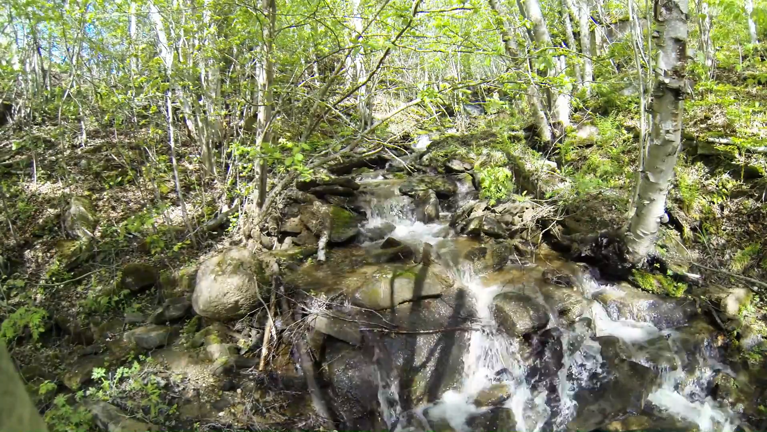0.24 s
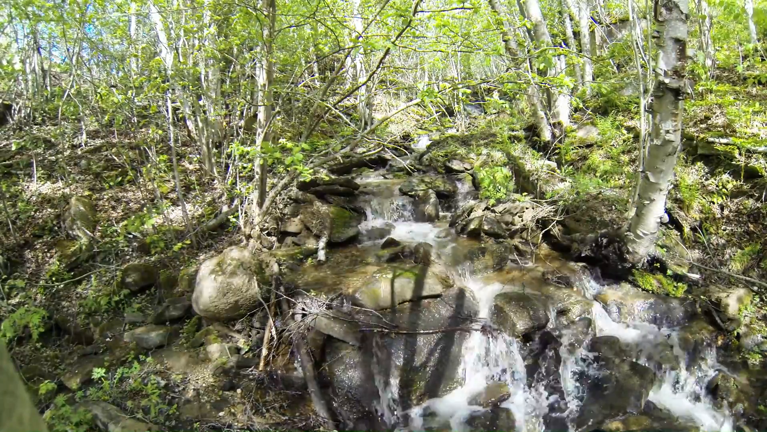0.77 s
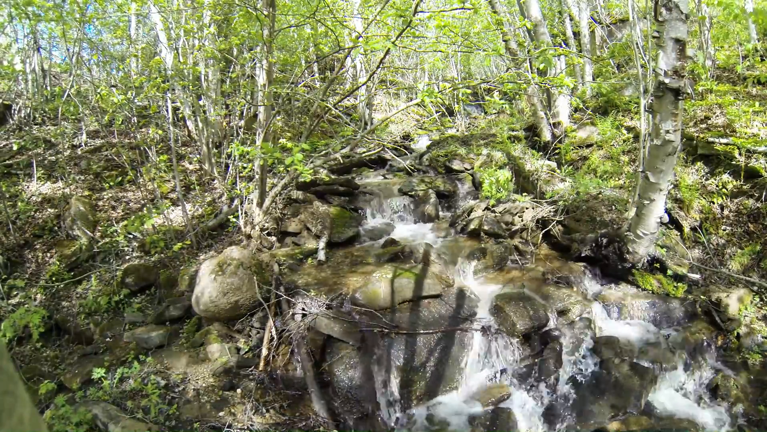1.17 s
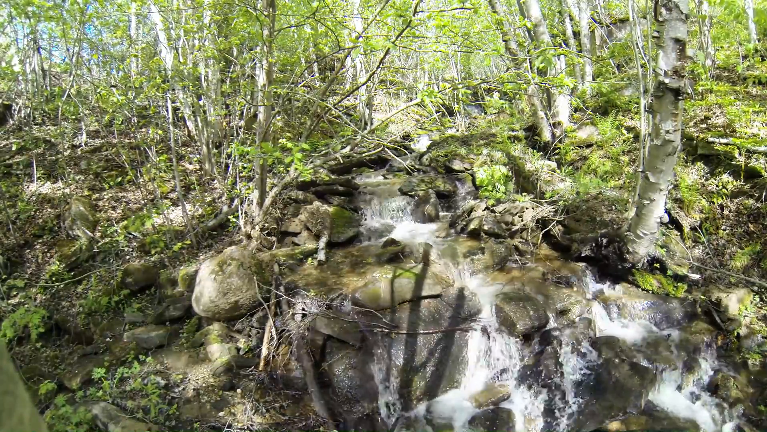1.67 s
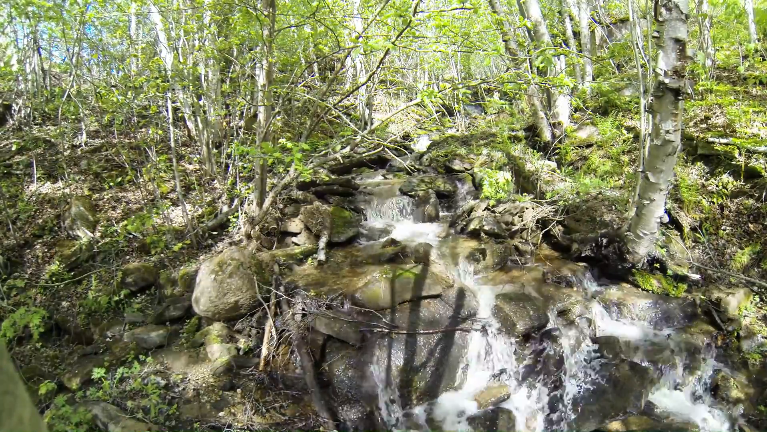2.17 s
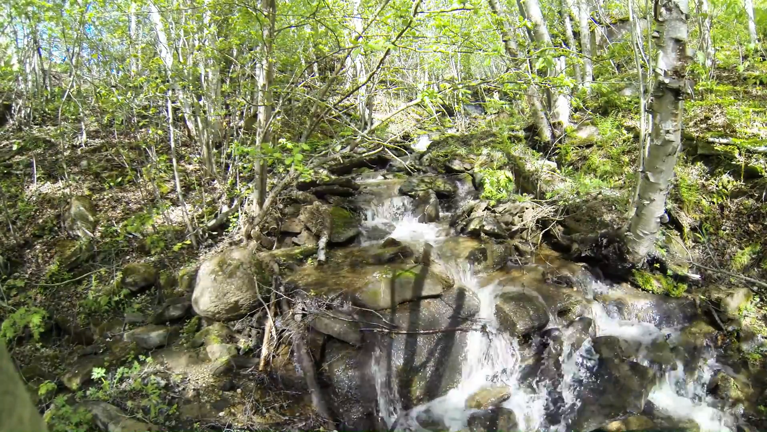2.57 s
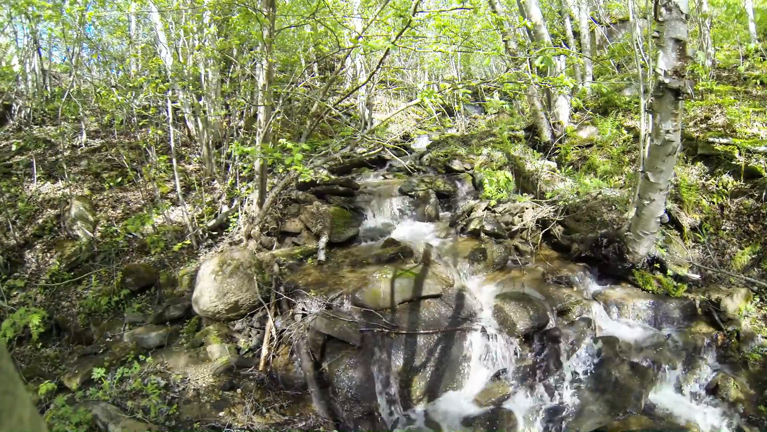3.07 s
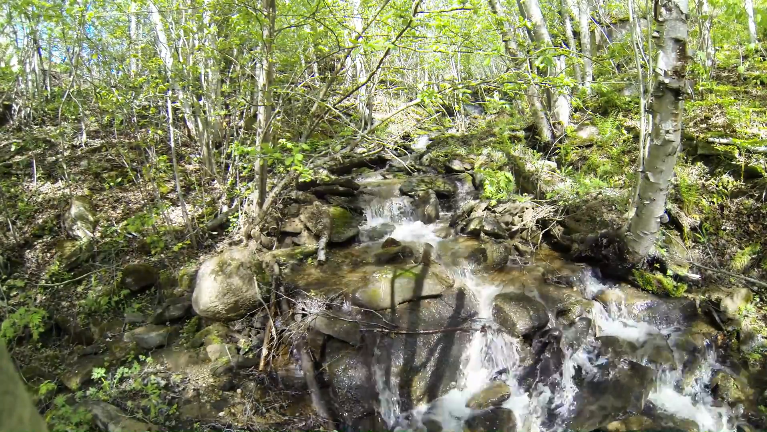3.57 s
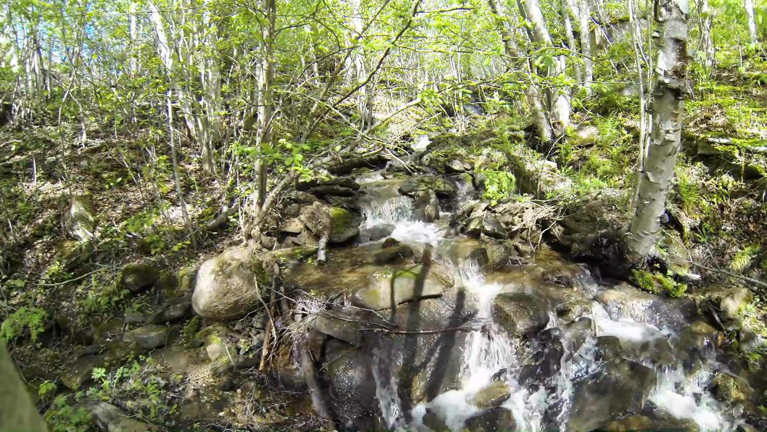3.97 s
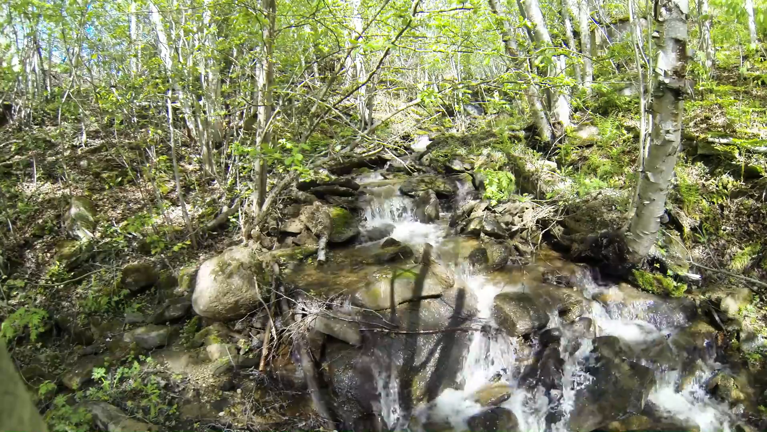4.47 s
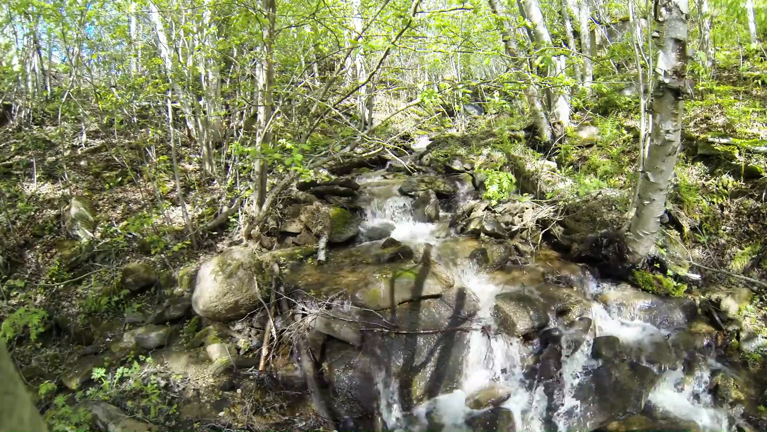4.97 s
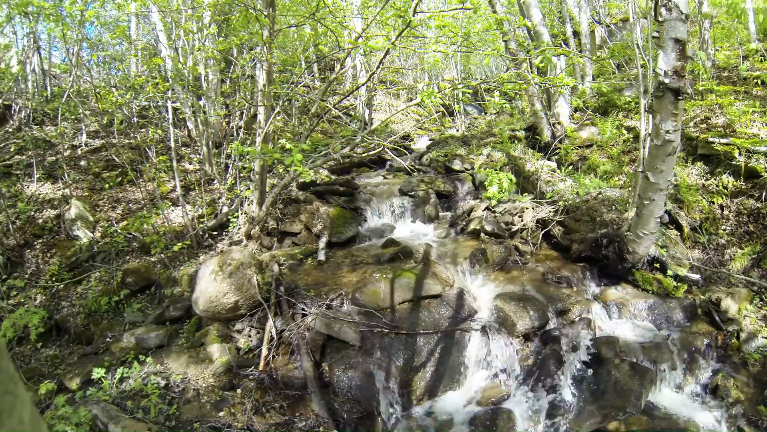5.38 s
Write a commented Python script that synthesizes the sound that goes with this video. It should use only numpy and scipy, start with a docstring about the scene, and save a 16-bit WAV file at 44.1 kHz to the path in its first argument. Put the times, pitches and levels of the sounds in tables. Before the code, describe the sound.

A small stream cascades over rocks, heard in mono from the bank outdoors. Low-mid churning from the plunge pools dominates, over a lumpy deep thrum, with bright hiss and fine patter on stones above. Two soft low wind buffets touch the microphone in the first second or so, then the air calms. Brief hollow gulps and small splashes poke out irregularly while the rush stays constant.

```python
"""Woodland stream over low rock falls

A small woodland stream runs down a series of little rock falls, heard in mono from the bank.
Plunge pools churn and thrum as shaped noise, and clouds of bubbles ring as decaying tones of rising pitch.
Spray and drops spatter on the stones in quick clumps; now and then a gulp rings or a splash fizzes.
Low noise is the breeze on the microphone: it swells in two early gusts and dies down to a calm."""
import sys
import numpy as np
from scipy import signal
from scipy.fft import rfft, irfft
from scipy.io import wavfile
from scipy.ndimage import uniform_filter1d

SR = 44100
rng = np.random.default_rng(int(sys.argv[2]) if len(sys.argv) > 2 else 0)


def digitize_waveform(pressure):
    """Quantize a signal to 16-bit integers and store it at the path in sys.argv[1].

    Rows of a 2-D input are taken as channels; values are limited to [-1, 1].
    """
    field = np.atleast_2d(pressure).T
    bounded = np.clip(field, -1, 1)
    quanta = np.round(bounded * 32767).astype(np.int16)
    wavfile.write(sys.argv[1], SR, quanta)


N = 248724  # length [samples]

# Spectra, all with columns (frequency [Hz], relative level per Hz [dB])
# water churning in the pools
POOL_SPECTRUM = [(100, -37), (190, -6), (240, -0.9), (300, -3.5), (360, 0.2), (400, -1), (520, -0.5),
                 (700, -2), (900, -3.5), (1150, -10.5), (1350, -17), (2400, -36.5)]
# deep thrum under the falls: (frequency [Hz], relative level per Hz [dB])
THRUM_SPECTRUM = [(20, -30), (52, -9.5), (72, -7.5), (92, 2), (120, -4), (146, 0), (175, -5), (210, -17.5),
                  (300, -26), (600, -67)]
# water breaking on the stones: (frequency [Hz], relative level per Hz [dB])
STONE_SPECTRUM = [(900, -27), (1300, -12.5), (1520, -6), (1790, -9.5), (2000, -5), (2450, 0.5),
                  (2900, -2.5), (3350, -5), (3850, -10.5), (4220, -11), (4650, -11), (5100, -12),
                  (5480, -14.5), (5950, -13.5), (7200, -15.5), (8800, -16), (11400, -26.5), (13000, -42)]
# breeze buffeting the microphone: (frequency [Hz], relative level per Hz [dB])
BREEZE_SPECTRUM = [(5, -25), (12, 3), (27, -5), (48, -5), (90, -20), (200, -26), (600, -82)]

# flow into the pools swells or slackens: (time [s], level change [dB], length [s])
POOL_SWELLS = [(.1, 1.2, 0.055), (.24, -1.5, 0.092), (.37, 1, 0.064), (.6, 1.1, 0.14), (.95, -1.5, 0.064),
               (1.11, 1, 0.042), (1.27, -0.5, .07), (1.39, 0.5, .13), (1.67, 0.5, 0.055), (1.88, 0.2, 0.17),
               (2.08, -1, 0.063), (2.29, 1, 0.18), (2.47, -1.2, .05), (2.63, 0, .1), (3.61, -1.3, 0.092),
               (4.23, -1.4, 0.054), (4.32, 1.5, .1), (4.46, 0.5, .06), (4.91, -.9, .12), (5.13, 1.7, 0.051),
               (5.57, .7, 0.083)]
# deep thrum surges or eases: (time [s], level change [dB], length [s])
THRUM_SURGES = [(.04, -4, .12), (.25, 3, .2), (.98, 2.5, .18), (1.36, -2, 0.074), (1.67, -4, 0.072),
                (1.82, 2, .09), (2.2, 1.5, .07), (2.43, -2, 0.084), (2.59, -2.5, 0.073), (2.96, 1.8, .14),
                (3.66, 1, .1), (3.79, 2.5, .09), (4.11, 2.5, .1), (4.32, 1, .08), (4.92, -3, .08),
                (5.05, 1, .13)]
# shower of drops on the stones thickens or thins: (time [s], level change [dB], length [s])
DROP_SHOWERS = [(.58, 2, .22), (2.03, 3, 0.12), (2.77, 2, .08), (2.92, -1, .08), (4.43, -3, 0.07),
                (4.77, 3.5, .14), (5.03, 2, .08), (5.2, -2, .12)]
# gusts on the microphone: (time [s], level swell [dB], length [s])
BREEZE_GUSTS = [(.41, 10, 0.39), (1.15, 7.5, 0.2)]

# large air pockets gulped under a fall:
# (time [s], starting pitch [Hz], relative peak level [dB], ring time to -60 dB [s])
AIR_GULPS = [(.518, 350, -14, 0.15), (.993, 183, -22.5, .08), (1.078, 394, -17, 0.14),
             (1.399, 346, -17, 0.14), (1.765, 837, -20, 0.096), (1.938, 420, -17, .1),
             (2.157, 222, -19, 0.12), (2.264, 622, -17, 0.1), (2.31, 654, -14.5, 0.12),
             (2.324, 475, -17, 0.056), (2.515, 540, -19, .09), (2.658, 442, -18, 0.088),
             (2.738, 498, -22, 0.092), (2.999, 99, -19, .12), (3.058, 617, -17, 0.11),
             (3.271, 117, -8.5, 0.044), (3.486, 660, -16, .055), (3.953, 966, -20.5, 0.15),
             (4.04, 299, -23.5, 0.093), (4.329, 618, -19, 0.076), (4.629, 170, -15.5, 0.069),
             (4.681, 284, -21, .09), (5.264, 252, -20, .1), (5.285, 860, -21, .08)]
# single splashes on the rock: (time [s], centre frequency [Hz], relative level [dB], length [s])
ROCK_SPLASHES = [(0.189, 2840, -26, .016), (.2, 6000, -34, .016), (.369, 1750, -29, .014),
                 (.37, 3130, -23, .013), (.525, 6000, -39, 0.046), (0.777, 2700, -24, .011),
                 (0.773, 5500, -33, .014), (1.25, 5500, -37, .05), (1.445, 3600, -30, .014),
                 (1.868, 2820, -24, 0.023), (2, 2820, -25, 0.013), (2.2, 1680, -29, 0.014),
                 (2.219, 5800, -30, .012), (2.295, 2880, -22, 0.015), (2.374, 1900, -28, .011),
                 (2.786, 2730, -24, .014), (2.883, 8000, -23, 0.0033), (3.108, 2500, -23, 0.016),
                 (3.126, 5500, -30, 0.01), (3.817, 5600, -28, .008), (4.182, 2800, -23, 0.012),
                 (4.807, 2400, -21, 0.011), (4.981, 8900, -29, .0049), (5.399, 2500, -24.5, 0.019),
                 (5.507, 9300, -27, .0046), (5.51, 2620, -24.5, 0.016)]

# the flow wavers by chance about its mean: rms depth in each layer [dB], and rate [per s]
CHURN_WAVER_DB, THRUM_WAVER_DB, STONES_WAVER_DB, WAVERS_PER_S = 0.28, 0.8, 0.28, 13
# single drops on the rock: level against the hiss [dB], drops per second, burst decay [s],
# spread of sizes [dB]
PATTER_DB, PATTERS_PER_S, PATTER_S, PATTER_SPREAD_DB = -7.5, 130, 0.0016, 2.5
# the breeze, gusts aside: first and last level [dB], hold and fade times [s]
BREEZE_DB, CALM_DB, BREEZE_HOLD_S, BREEZE_FADE_S = -38, -49, 0.92, 1.4
EDGE_HZ = 12650  # upper band edge of the recorder


def gain_of(db):
    """Decibels to amplitude."""
    return 10 ** (np.asarray(db) / 20)


def evened(x):
    """Scales to rms 1."""
    return x / np.sqrt(np.mean(x ** 2) + 1e-20)


def steadied(x, size=6000):
    """Holds a sound near rms 1 over spans of size samples, keeping its quicker grain."""
    power = uniform_filter1d(uniform_filter1d(x ** 2, size), size // 2)
    return x / np.sqrt(power + 1e-20)


def coloured(x, spectrum):
    """Filters x by a curve of (frequency [Hz], level [dB]) points, at rms 1."""
    hz, db = np.transpose(spectrum)
    bins_hz = np.fft.rfftfreq(N, 1 / SR)
    curve_db = np.interp(np.log(bins_hz + 1), np.log(hz + 1), db)
    return evened(irfft(rfft(x) * gain_of(curve_db), N))


def wander(rate):
    """Slow chance of rms 1, changing up to about rate times a second."""
    hz = np.fft.rfftfreq(N, 1 / SR)
    lowpass = (hz > 2) / (1 + (hz / rate) ** 2)
    return evened(irfft(rfft(rng.standard_normal(N)) * lowpass, N))


def swells(rows):
    """Smooth rises and falls in dB, one per row, each above half its height for its length."""
    t = np.arange(N) / SR
    return sum(db * 0.5 ** ((2 * (t - s) / length) ** 2) for s, db, length in rows)


def impacts(per_s, spread_db):
    """A random train of impulses of either sign: many small, a few large."""
    size = gain_of(spread_db * np.minimum(rng.exponential(1, N), 5))
    return size * rng.choice([-1, 1], N) * (rng.random(N) < per_s / SR)


def add(mix, s, sound):
    """Mixes a sound in at time s [s]."""
    part = mix[max(round(s * SR), 0):][:len(sound)]
    part += sound[:len(part)]


def bubble(hz, t60, rise, onset_cycles):
    """A pocket of air rings and dies, its pitch rising as it nears the surface."""
    t = np.arange(int(t60 * SR) + 2) / SR
    turns = hz * (t + rise * t ** 2 / (2 * t60))  # pitch is up by the fraction rise at t60
    decay = np.exp(-np.log(1000) * t / t60)
    onset = 1 - np.exp(-turns / onset_cycles)
    ring = np.sin(2 * np.pi * turns) * decay * onset
    return ring / abs(ring).max()


def bubble_cloud(low_hz, high_hz, per_s, cycles, rise, spread_db, count):
    """Bubbles of many sizes, each size born at its own random moments; equal power per Hz."""
    cloud = np.zeros(N)
    for hz in np.geomspace(low_hz, high_hz, count):
        ring = bubble(hz, cycles / hz, rise, onset_cycles=0.59)
        births = impacts(per_s / count, spread_db)
        cloud += np.sqrt(hz) * evened(signal.oaconvolve(births, ring)[:N])
    return cloud


def pools():
    """The churn of the plunge pools and the gurgle of large bubbles in them, swelling with the flow."""
    churn = coloured(rng.standard_normal(N), POOL_SPECTRUM)
    cloud = bubble_cloud(199.1, 1546, per_s=850, cycles=23.6, rise=0.12, spread_db=1.5, count=36)
    gurgle = coloured(cloud, POOL_SPECTRUM)
    level_db = -25.0 + swells(POOL_SWELLS) + CHURN_WAVER_DB * wander(WAVERS_PER_S)
    return gain_of(level_db) * steadied(churn + gurgle, size=4000)


def thrum():
    """The falls drive into the pools with a deep, lumpy thrum."""
    level_db = -31.1 + swells(THRUM_SURGES) + THRUM_WAVER_DB * wander(WAVERS_PER_S)
    return gain_of(level_db) * steadied(coloured(rng.standard_normal(N), THRUM_SPECTRUM))


def stones():
    """Hiss of the farther falls, with tinkling bubbles and patter in showers, and near spray."""
    hiss = coloured(rng.standard_normal(N), STONE_SPECTRUM)
    cloud = bubble_cloud(1194, 4710, per_s=2200, cycles=30, rise=0.056, spread_db=1.5, count=40)
    clumped = coloured(cloud, STONE_SPECTRUM) * gain_of(0.6 * wander(rate=16))
    tinkle = steadied(clumped, size=4000)
    drops = gain_of(-4.0) * tinkle + gain_of(PATTER_DB) * patter()
    showers = drops * gain_of(swells(DROP_SHOWERS))
    near_spray = gain_of(-1.5) * steadied(coloured(spray(), STONE_SPECTRUM))
    level_db = -32.0 + STONES_WAVER_DB * wander(WAVERS_PER_S)
    return gain_of(level_db) * (hiss + showers + near_spray)


def spray(count=8):
    """Drops land in clumps; each of count overlapping bands of pitch swells by its own chance."""
    hz = np.fft.rfftfreq(N, 1 / SR)
    drops = impacts(per_s=8000, spread_db=2.5) * gain_of(0.63 * wander(rate=44))
    spectrum = rfft(drops) * hz / np.hypot(hz, 7000)  # small drops carry little bass
    place = np.clip(hz / EDGE_HZ, 0, 1) * (count - 1)
    out = np.zeros(N)
    for k in range(count):
        band = np.maximum(1 - abs(place - k), 0)
        out += irfft(spectrum * band, N) * gain_of(1.56 * wander(rate=24))
    return out


def patter():
    """Single drops strike the wet rock at uneven moments; each bursts into a few tiny bubbles."""
    out = np.zeros(N)
    for centre in np.geomspace(1900, 3800, num=6):
        strikes = impacts(PATTERS_PER_S / 6, PATTER_SPREAD_DB) ** 2
        power = signal.lfilter([1], [1, -np.exp(-1 / (PATTER_S * SR))], strikes)
        ring = bubble(centre, 9 / centre, rise=0.045, onset_cycles=0.47)
        fizz = signal.oaconvolve(rng.standard_normal(N), ring)[:N]
        out += evened(fizz * np.sqrt(power))
    return steadied(coloured(out, STONE_SPECTRUM), size=12000)


def gulps():
    """Large air pockets swell over a few cycles and ring briefly."""
    out = np.zeros(N)
    for s, hz, db, t60 in AIR_GULPS:
        add(out, s, gain_of(db) * bubble(hz, t60, rise=0.063, onset_cycles=2.1))
    return gain_of(-5.0) * out


def splashes(width=0.13):
    """A slap of water bursts into a puff of tiny bubbles of similar size: a band of noise."""
    out = np.zeros(N)
    for s, hz, db, length in ROCK_SPLASHES:
        u = np.arange(SR // 10) / SR / (length / 3)  # the puff peaks at u = 1
        band = np.clip([hz / (1 + width), hz * (1 + width)], 100, SR / 2 - 100)
        bandpass = signal.butter(2, band, "band", fs=SR, output="sos")
        fizz = evened(signal.sosfilt(bandpass, rng.standard_normal(len(u))))
        puff = u * np.exp(1 - u)
        add(out, s - length / 2, gain_of(db) * fizz * puff)
    return gain_of(-3.5) * out


def breeze():
    """Eddies buffet the microphone in two gusts, then the air calms."""
    calmed = np.clip((np.arange(N) / SR - BREEZE_HOLD_S) / BREEZE_FADE_S, 0, 1)
    level_db = BREEZE_DB + (CALM_DB - BREEZE_DB) * calmed + swells(BREEZE_GUSTS)
    rumble = coloured(rng.standard_normal(N), BREEZE_SPECTRUM)
    return gain_of(level_db) * steadied(rumble, size=10000)


def scene():
    """All the water and the breeze, alike in both channels."""
    mono = pools() + thrum() + stones() + gulps() + splashes() + breeze()
    return np.array([mono, mono])


def record(dry):
    """The recorder's band limit: a steep low-pass."""
    lowpass = signal.firwin(511, EDGE_HZ, window=("kaiser", 9), fs=SR)
    return signal.oaconvolve(dry, lowpass[None], "same")


dry = scene()
out = record(dry)
digitize_waveform(out)
```